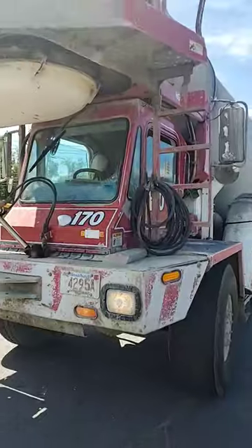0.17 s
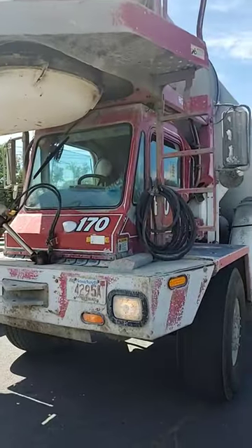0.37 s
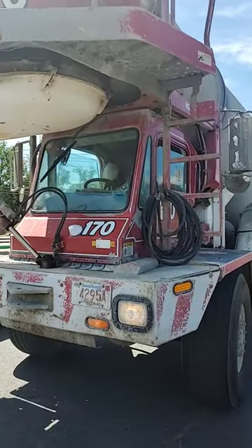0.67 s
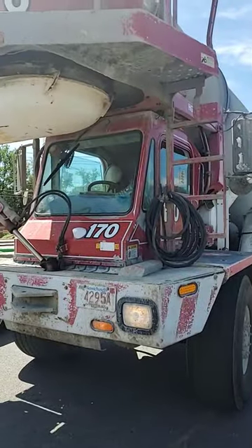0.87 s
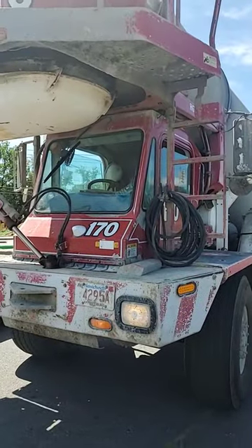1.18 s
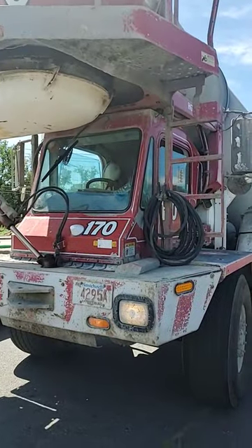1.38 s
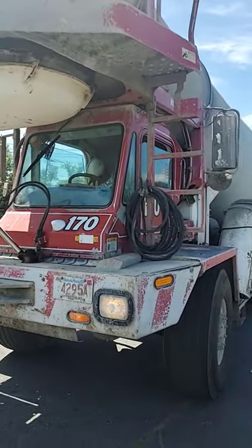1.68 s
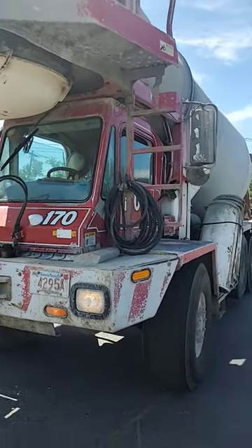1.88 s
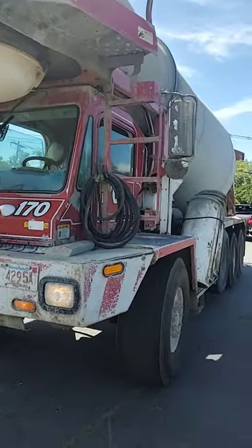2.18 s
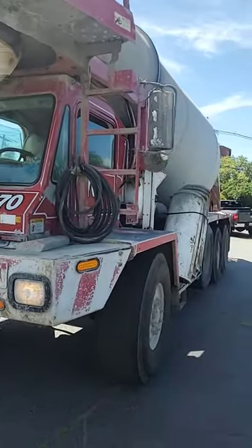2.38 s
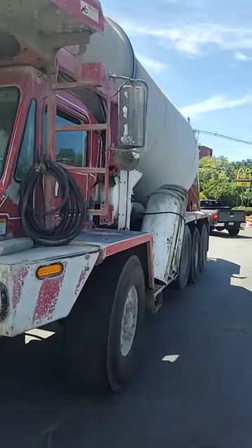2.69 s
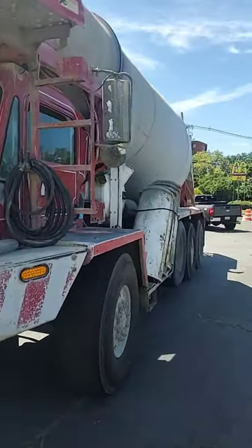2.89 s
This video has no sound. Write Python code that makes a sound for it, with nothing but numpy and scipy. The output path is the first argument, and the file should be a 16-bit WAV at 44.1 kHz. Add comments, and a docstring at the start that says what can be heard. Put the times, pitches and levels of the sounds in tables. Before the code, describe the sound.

A diesel mixer truck idles steadily in an open paved lot, its deep rumble and hum topped by even engine clatter and fan noise. Light wind buffets the hand-held microphone a few metres away, with a few soft low thumps.

```python
"""A six-cylinder diesel truck idles in an open paved lot, a few metres from a hand-held phone.
After a short silence, exhaust and pump tones hum inside a boomy rumble, and each firing makes the
engine block clatter over the roar of the fan. At 0.2 s something brushes the right microphone.
Light wind buffets both microphones, most at 0.3 s and 1.6 s. A few low thumps come along the way,
the strongest near 2.8 s, and the engine runs on to the end at about 3 s."""
import sys
import numpy as np
from scipy import signal
from scipy.fft import rfft, irfft
from scipy.io import wavfile
from scipy.ndimage import uniform_filter1d, map_coordinates

SR = 44100
rng = np.random.default_rng(int(sys.argv[2]) if len(sys.argv) > 2 else 0)


def transcribe(signal):
    """Save signal, clipped to [-1, 1], as a 16-bit WAV file at the path in sys.argv[1]."""
    frames = np.atleast_2d(signal).T
    limited = np.clip(frames, -1, 1)
    pcm = np.round(limited * 32767).astype(np.int16)
    wavfile.write(sys.argv[1], SR, pcm)


N = 134064
TIME = np.arange(N) / SR
FIRING_HZ, FIRST_FIRING_S = 33.86, .048

# Strength of the wind. Each row: time in seconds, level in dB.
WIND_LEVEL = [(.08, -43), (.3, -19.5), (.5, -35), (.7, -29), (1.0, -29), (1.15, -32), (1.6, -24.5),
              (1.8, -38), (2.2, -29), (2.6, -56), (2.9, -39), (3.04, -42)]
# Noise bands of the rub. Each row: centre in Hz, width in Hz, full level in dB, growth in dB a second.
BRUSH_BANDS = [(249, 260, -27, 5), (600, 870, -31, 32), (2000, 2100, -38, 80), (12500, 9700, -43, 80)]
# Lone bass thumps. Each row: middle in seconds, height of the swell in dB, pitch in Hz.
BASS_THUMPS = [(.11, -13.5, 108), (1.21, -14, 94.5), (1.373, -18, 100), (2.59, -17, 90),
               (2.841, -10, 74.66)]
# Tone colour of the roar. Each row: frequency in Hz, relative level in dB.
ROAR_COLOUR = [(12, -28), (22, -13), (30, -9), (70, -2.5), (110, -7), (185, -11.5), (250, -13), (370, -18),
               (450, -18), (600, -20.5), (1050, -21.5), (1200, -26), (2050, -28), (2400, -35),
               (2800, -36.5), (3200, -38.5), (4300, -41.5), (7300, -55.5), (9500, -54), (15500, -56)]
# How unlike the two microphones sound. Each row: frequency in Hz, opposed minus shared noise in dB.
ROAR_SPREAD = [(25, -14), (60, -6), (110, -15.5), (200, -18), (380, -12), (700, -8), (1290, -3),
               (1900, -4.5), (2400, -1), (4400, -0.5), (8120, -.5), (15000, 1.5)]
# Which way the roar leans. Each row: frequency in Hz, left minus right in dB.
ROAR_PAN = [(30, 0), (60, -2.5), (150, -2), (380, -.5), (700, 3.5), (1290, -1), (2380, -0.5), (3500, 3.5),
            (5500, -1.5), (8120, 1), (12000, -2), (15000, -3.5)]
# How much the roar pulses. Each row: frequency in Hz, share of power that a knock of size 1 adds.
KNOCK_DEPTH = [(300, 0.084), (800, 0.19), (2200, 0.81), (4500, 0.4), (9000, 0.22)]
# Drift of the roar's middle. Each row: time in seconds, then low, centre and upper middle gains in dB.
MIDDLE_GAINS = [(.08, 0.5, -3, -1.5), (.2, 2.5, 1.5, -0.5), (.35, 1.5, 0.5, -1), (.9, -1, 0.5, -0.5),
                (1.6, 1, 0, 1.5), (2.3, 0, 0.5, 1.5), (3.04, -0.5, 0, 0.5)]
# Drift of the roar's clattering bands, 1.4 to 7 kHz. Each row: time in seconds, gain in dB.
CLATTER_GAIN = [(.08, -0.5), (.6, 0), (1.2, -0.5), (1.8, 1), (2.4, 0), (3.04, 0.5)]
# Drift of the roar above 7 kHz. Each row: time in seconds, gain in dB.
TREBLE_GAIN = [(.08, -2), (.2, -1.5), (.35, 1), (1.5, 0.5), (1.88, 3), (2.2, 1), (3.04, 1)]
# Boom of the truck's body. Each row: time in seconds, pitch in Hz, level in dB.
BODY_BOOM = [(.09, 82.1, -30), (.2, 86.9, -35), (.29, 90, -20), (.35, 90.5, -24), (.43, 87, -18),
             (.52, 82.76, -24.5), (.68, 81.7, -26.5), (.87, 81.9, -41), (1.0, 79.9, -37),
             (1.28, 89.9, -38.5), (1.37, 87.2, -18.5), (1.5, 77.8, -29.5), (1.61, 73.84, -28.5),
             (1.7, 82.3, -30.5), (1.85, 85.5, -24), (1.98, 85.4, -22), (2.07, 85.3, -16), (2.14, 85, -27.5),
             (2.24, 81.5, -22.5), (2.32, 80.67, -19), (2.37, 79, -35), (2.47, 83.3, -21.5),
             (2.6, 82.5, -25.5), (2.71, 80.16, -22), (2.86, 78.6, -20.5), (2.94, 78.6, -50),
             (3.04, 79.4, -38)]
# Hum of the pump and fan. Each row: pitch in Hz, level in dB.
PUMP_FAN_TONES = [(45, -41), (60.5, -34.5), (108.5, -40), (126, -39.5), (144.8, -32), (161.5, -44.5),
                  (349, -53), (541, -53), (556, -63)]
# Exhaust tones. Each row: multiple of the firing rate, base level in dB, left minus right in dB.
EXHAUST_TONES = [(1, -35.5, -1), (3, -34, 3.5), (5, -41, 4), (6, -43.5, -3), (7, -39, 5.5), (9, -47.5, -1)]
# The upper exhaust tones change as the phone moves along the truck.
# Each row: time in seconds, gain of the fifth multiple in dB, gain of the higher ones in dB.
UPPER_EXHAUST_GAINS = [(.08, -7, 0), (.3, 0, -2), (.8, -1.5, -6), (1.3, -1, -1), (1.55, 2.5, 1),
                       (1.9, 2, 0.5), (2.2, 0, 5), (2.6, 8.5, -1), (2.8, 3.5, -3.5), (3.04, 1, -0.5)]
# How hard the six cylinders knock. Each entry: one cylinder's gain in dB, in firing order.
CYLINDER_GAINS = [0, 0, 2, -1.5, -5.5, 2]
# Notes the engine block rings at.
# Each row: pitch in Hz, width in Hz, base level in dB, factor for how much the cylinders differ.
BLOCK_NOTES = [(987, 150, -51.5, 1), (2030, 95, -50, 1.7), (2300, 470, -67, 1.4), (2620, 200, -57, 0.53),
               (4270, 120, -64, 1.4)]
# Drift of the block's note near 2.6 kHz. Each row: time in seconds, gain in dB.
HIGH_NOTE_GAIN = [(.08, -6), (.7, -1), (1.1, 8), (1.4, 4), (1.8, 3), (2.5, -4), (3.04, -3)]


def from_db(db):
    """Turn decibels into a factor to multiply a signal by."""
    return 10 ** (np.asarray(db, float) / 20)


def unit_rms(x):
    """Scale a signal to an average power of 1."""
    return x / np.sqrt(np.mean(x ** 2))


def at_hz(table, hz):
    """Read a table at the given frequencies, with octaves evenly spaced."""
    rows = np.array(table, float)
    return np.interp(np.log(hz), np.log(rows[:, 0]), rows[:, 1])


def over_time(table, column=1):
    """Join a table's points with straight lines, one value for each sample."""
    rows = np.array(table, float)
    return np.interp(TIME, rows[:, 0], rows[:, column])


def smooth(x, samples):
    """Round off fast changes by averaging twice."""
    return uniform_filter1d(uniform_filter1d(x, samples), samples)


def wander(rate_hz):
    """A smooth random curve, about 1 in size, with rate_hz new values a second."""
    hold = int(SR / rate_hz)
    steps = np.repeat(rng.standard_normal(N // hold + 1), hold)
    return 1.3 * smooth(steps, hold)[:N]


def band_noise(hz, width_hz):
    """Noise gathered around one pitch, with an average power of 1."""
    freqs = np.fft.rfftfreq(N, 1 / SR) + 1e-3
    off_centre = (freqs - hz ** 2 / freqs) / width_hz
    return unit_rms(irfft(rfft(rng.standard_normal(N)) / (1 + off_centre ** 2), N))


def wavering_tone(cycles, db):
    """A pure tone that follows a running count of cycles and wavers a little in level."""
    level = from_db(db + .7 * wander(rate_hz=4))
    return np.sqrt(2) * level * np.sin(2 * np.pi * (cycles + rng.random()))


def wind(shared_power=.53, gust_db=1.2):
    """Gusts make a low flutter that is only partly alike at the two microphones."""
    both, left, right = (band_noise(hz=61, width_hz=29) * from_db(gust_db * wander(7.38))
                         for _ in range(3))
    flutter = np.sqrt(shared_power) * both + np.sqrt(1 - shared_power) * np.array([left, right])
    return from_db(over_time(WIND_LEVEL)) * flutter


def brush(start_s=.209, rise_s=.005, hold_s=.038, fall_s=.022, grain_db=1.2):
    """A short, grainy rub on the right microphone that presses harder before it lets go."""
    age = TIME - start_s
    length_s = rise_s + hold_s + fall_s
    shape = np.clip(np.minimum(age / rise_s, (length_s - age) / fall_s), 0, 1)
    grain = from_db(grain_db * wander(300))
    growth_s = np.clip(age - hold_s, -length_s, 0)  # climbs to 0, where the bands stop growing
    rub = sum(from_db(db + growth * growth_s) * band_noise(hz, width_hz)
              for hz, width_hz, db, growth in BRUSH_BANDS)
    return np.array([np.zeros(N), shape * grain * rub])


def thumps(width_cycles=.97):
    """Short, low pushes of air, a cycle or two long, alike at both microphones."""
    out = 0
    for middle_s, db, hz in BASS_THUMPS:
        cycles = (TIME - middle_s) * hz
        swell = np.exp(-(2 * cycles / width_cycles) ** 2)
        out = out + from_db(db) * swell * np.sin(2 * np.pi * cycles)
    return out


def roar_drift_db(hz):
    """The slow rise and fall of one band of the roar; the bass has none."""
    if hz > 7000:
        return over_time(TREBLE_GAIN)
    if hz > 1400:
        return over_time(CLATTER_GAIN)
    if hz > 250:
        return over_time(MIDDLE_GAINS, column=1 + (hz > 500) + (hz > 1000))
    return 0


def roar(firings, base_db=-38):
    """Fan, intake and block noise: its bands swell together, flicker alone and pulse with each knock."""
    freqs = np.maximum(np.fft.rfftfreq(N, 1 / SR), 1)
    colour_db = at_hz(ROAR_COLOUR, freqs)
    shared = rfft(rng.standard_normal(N)) * from_db(colour_db)
    opposed = rfft(rng.standard_normal(N)) * from_db(colour_db + at_hz(ROAR_SPREAD, freqs))
    lean = from_db(at_hz(ROAR_PAN, freqs) / 2)
    spectra = np.array([(shared + opposed) * lean, (shared - opposed) / lean])
    knock = knock_power(firings)
    swell_db = .3 * wander(2.28)
    out = 0
    for hz in 5 * 2. ** np.arange(0, 12.1, .5):  # bands half an octave apart
        octaves_away = np.clip(np.log2(freqs / hz), -.5, .5)
        band = irfft(spectra * np.cos(np.pi * octaves_away) ** 2, N)
        flicker_db = .58 * wander(12.02)
        level = from_db(swell_db + flicker_db + roar_drift_db(hz))
        pulse = 1 + at_hz(KNOCK_DEPTH, hz) * knock
        out = out + band * level * np.sqrt(pulse / pulse.mean())
    upper_rms = np.sqrt(np.mean(irfft(shared * (freqs > 1000), N) ** 2))
    return out / upper_rms * from_db(base_db)  # the shared noise above 1 kHz sets the scale


def body_boom(width_hz=8.2, roughness=.1):
    """The body booms on one low note that swells and drifts, roughened by swirling air."""
    span = int(SR / width_hz / 4)
    swirl = [unit_rms(smooth(rng.standard_normal(N), span)) for _ in range(2)]
    phase = 2 * np.pi * np.cumsum(over_time(BODY_BOOM)) / SR
    note = (1 + roughness * swirl[0]) * np.cos(phase) - roughness * swirl[1] * np.sin(phase)
    return from_db(over_time(BODY_BOOM, column=2)) * unit_rms(note)


def pump_and_fan():
    """The spinning pump and fan hum at steady pitches."""
    return sum(wavering_tone(hz * TIME, db) for hz, db in PUMP_FAN_TONES)


def exhaust(firings):
    """The exhaust hums at whole multiples of the firing rate."""
    out = 0
    for multiple, db, pan_db in EXHAUST_TONES:
        if multiple >= 5:
            db = db + over_time(UPPER_EXHAUST_GAINS, column=1 if multiple == 5 else 2)
        left_right = from_db([[pan_db / 2], [-pan_db / 2]])
        out = out + left_right * wavering_tone(multiple * firings, db)
    return out


def knock_power(firings, unevenness=1., decay_s=.0069, scatter_db=1.2):
    """Burning fuel knocks at each firing: the power jumps up, then dies away quickly."""
    count = np.floor(firings).astype(int)
    cylinder_db = unevenness * np.array(CYLINDER_GAINS)[count % 6]
    random_db = scatter_db * rng.standard_normal(N // 100)[count]
    age = (firings % 1) / FIRING_HZ
    return from_db(cylinder_db + random_db) ** 2 * np.exp(-age / decay_s)


def block_clatter(firings, ring_s=.0088, flicker_db=1.6, right_delay_s=.00008):
    """Each knock rings the metal engine block; the right microphone hears it a little late."""
    fade = np.exp(-1 / (ring_s * SR))
    left = 0
    for hz, width_hz, db, unevenness in BLOCK_NOTES:
        ring_power = signal.lfilter([1 - fade], [1, -fade], knock_power(firings, unevenness))
        flicker = from_db(flicker_db * wander(25))
        ring = unit_rms(np.sqrt(ring_power) * flicker * band_noise(hz, width_hz))
        if 2500 < hz < 3000:
            db = db + over_time(HIGH_NOTE_GAIN)
        left = left + from_db(db) * ring
    right = map_coordinates(left, [np.arange(N) - right_delay_s * SR], mode="mirror")
    return np.array([left, right])


def scene():
    """Add up all the sounds; one running count of firings keeps the engine's parts in step."""
    firing_hz = FIRING_HZ * (1 + .0005 * wander(.96))
    firings = np.cumsum(firing_hz) / SR + 6 - FIRST_FIRING_S * FIRING_HZ  # 6 keeps the count above 0
    truck = exhaust(firings) + pump_and_fan() + body_boom() + block_clatter(firings) + roar(firings)
    return truck + thumps() + wind() + brush()


def record(dry, start_s=.0827, bottom_hz=15, top_hz=15490):
    """The phone starts after a short silence, thins the deepest bass and cuts the highest treble."""
    bass_cut = signal.butter(1, bottom_hz, "high", fs=SR, output="sos")
    treble_cut = signal.ellip(14, .3, 60, top_hz, fs=SR, output="sos")
    started = signal.sosfilt(bass_cut, dry) * (TIME >= start_s)
    return signal.sosfilt(treble_cut, started)


dry = scene()
out = record(dry)
transcribe(out)
```